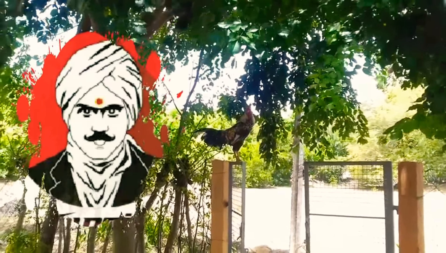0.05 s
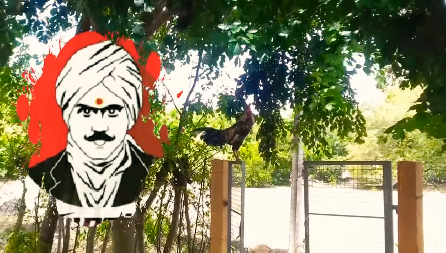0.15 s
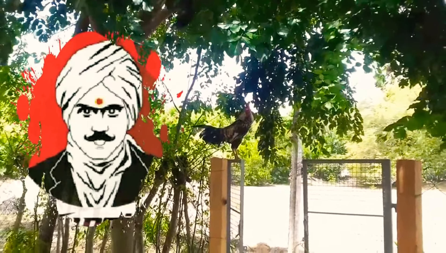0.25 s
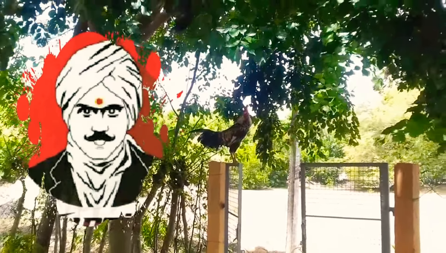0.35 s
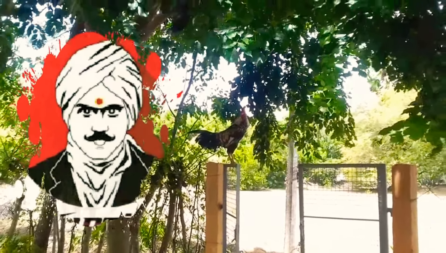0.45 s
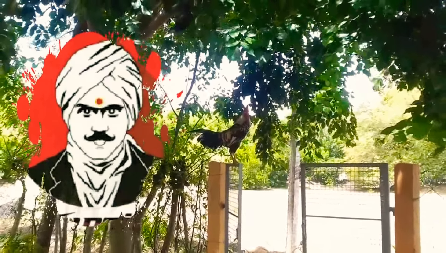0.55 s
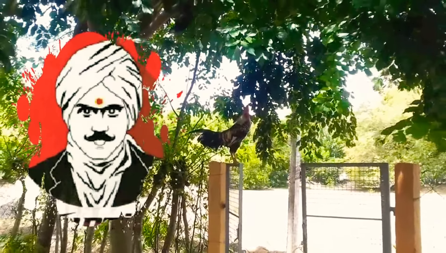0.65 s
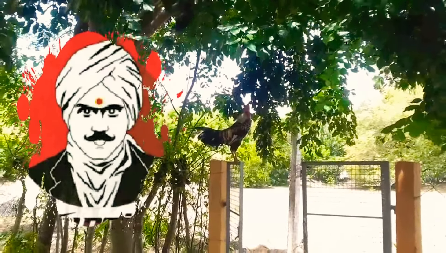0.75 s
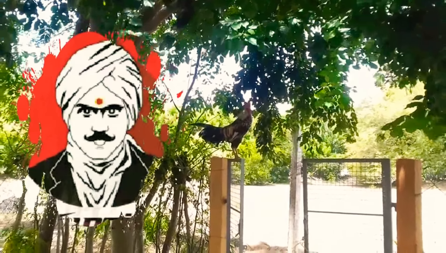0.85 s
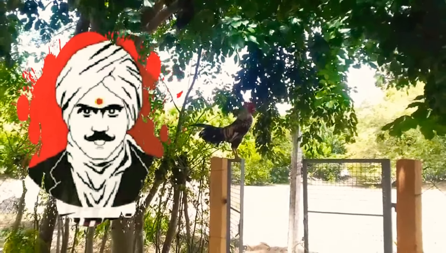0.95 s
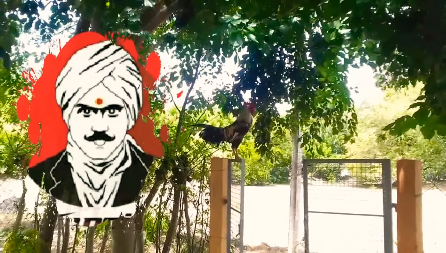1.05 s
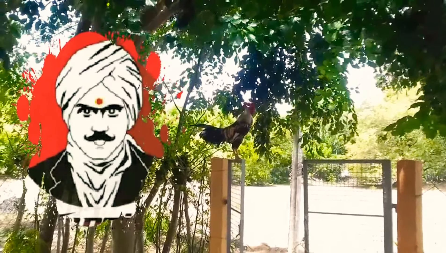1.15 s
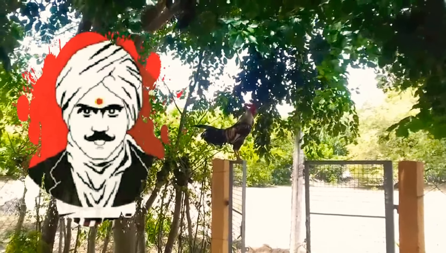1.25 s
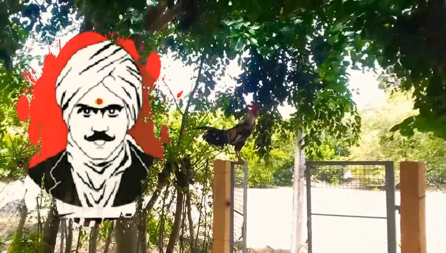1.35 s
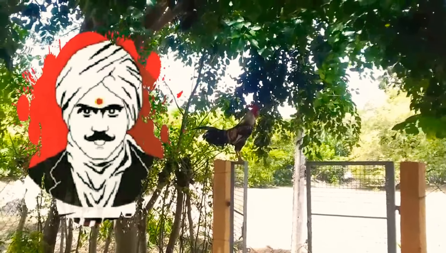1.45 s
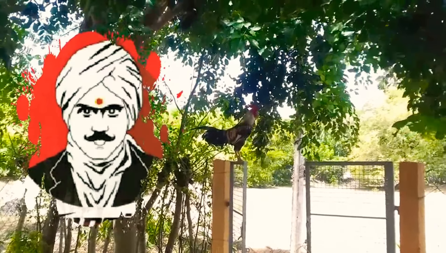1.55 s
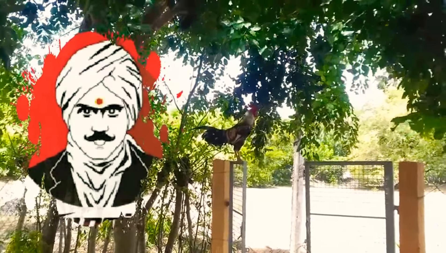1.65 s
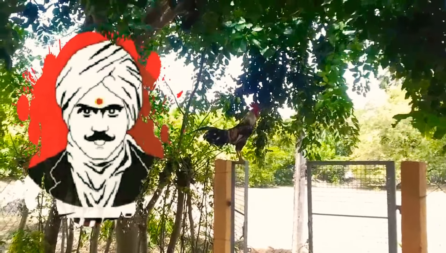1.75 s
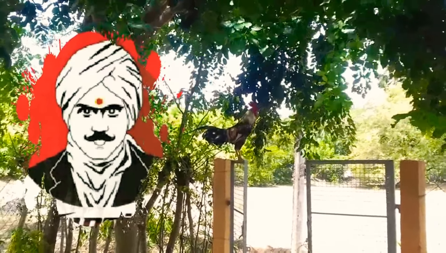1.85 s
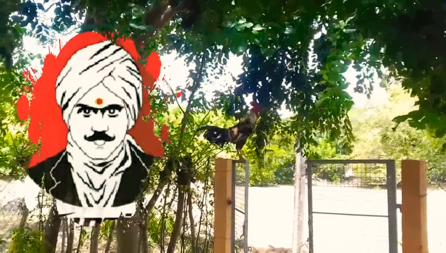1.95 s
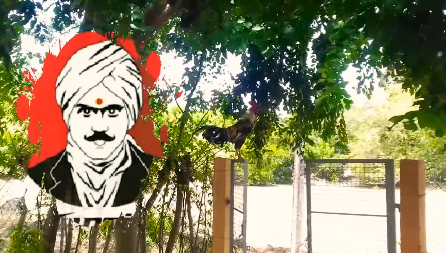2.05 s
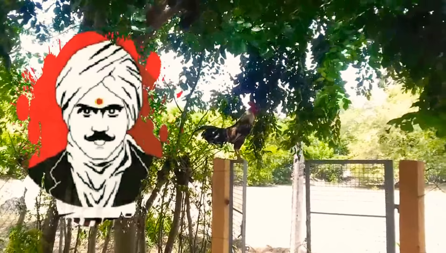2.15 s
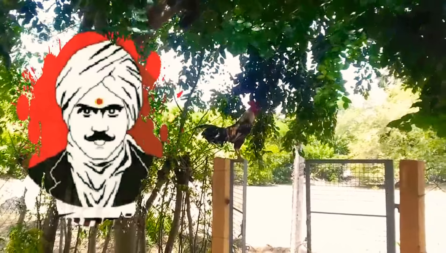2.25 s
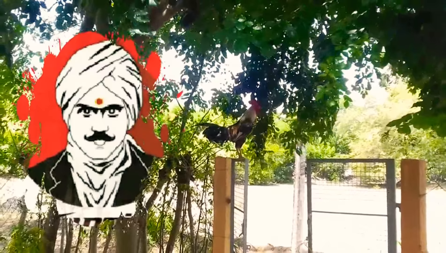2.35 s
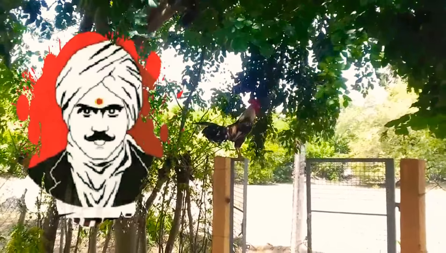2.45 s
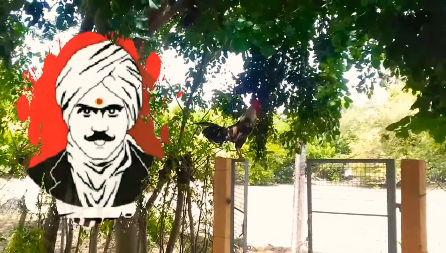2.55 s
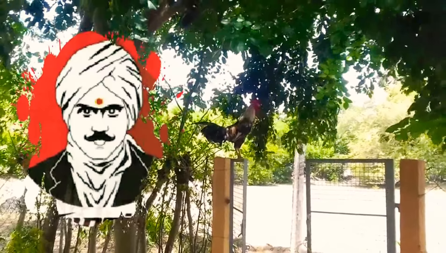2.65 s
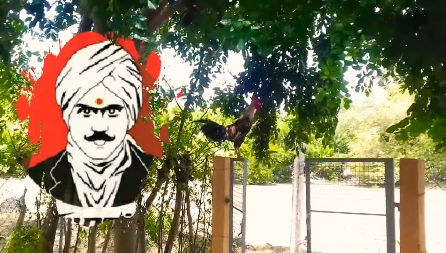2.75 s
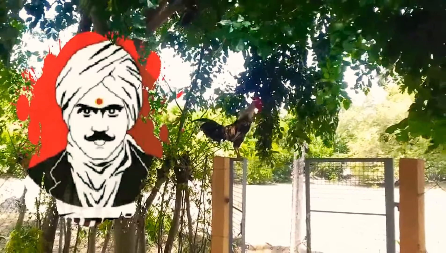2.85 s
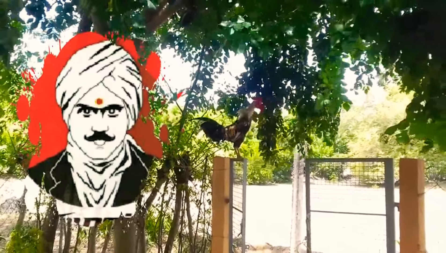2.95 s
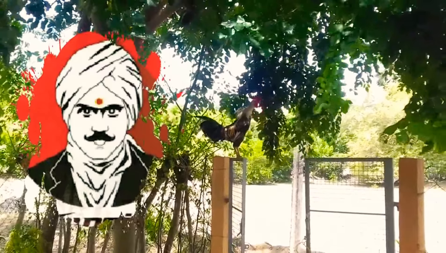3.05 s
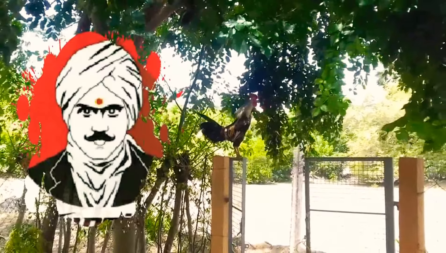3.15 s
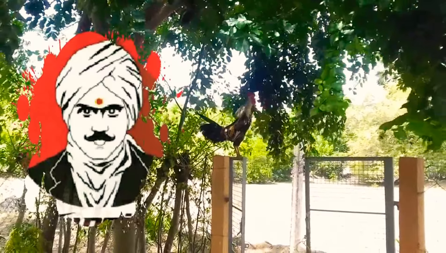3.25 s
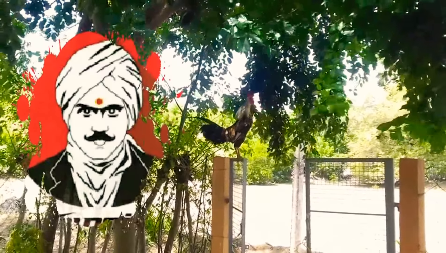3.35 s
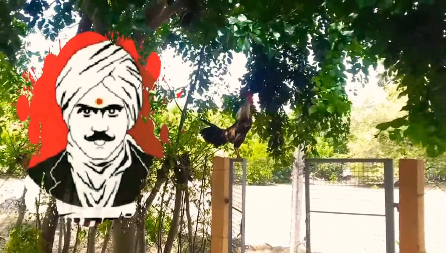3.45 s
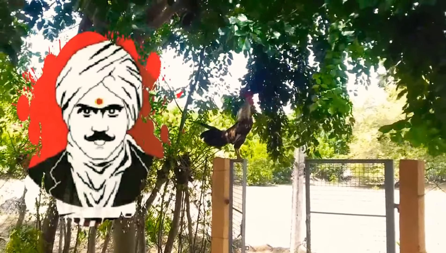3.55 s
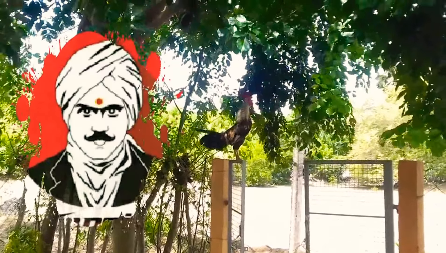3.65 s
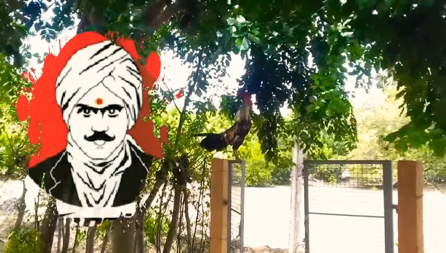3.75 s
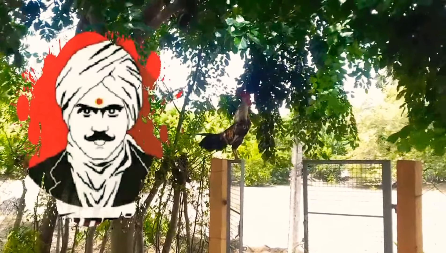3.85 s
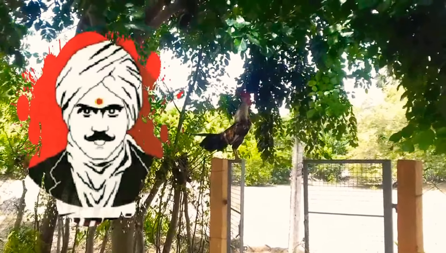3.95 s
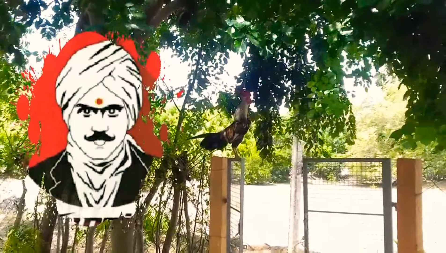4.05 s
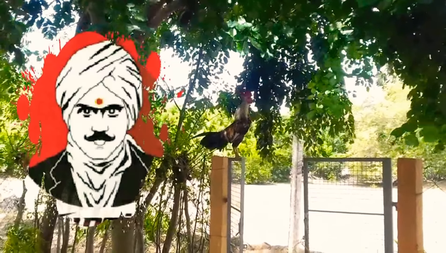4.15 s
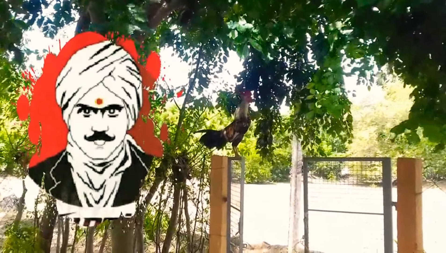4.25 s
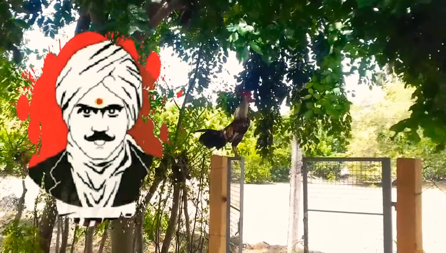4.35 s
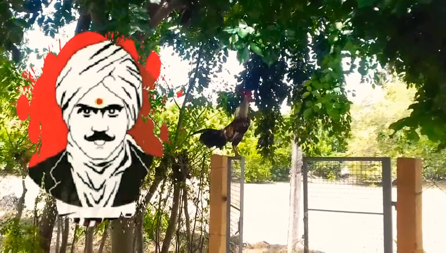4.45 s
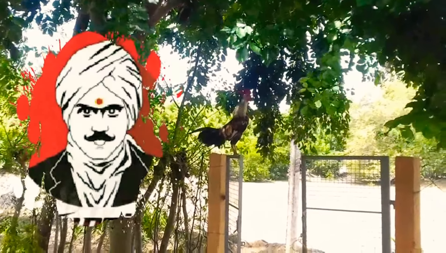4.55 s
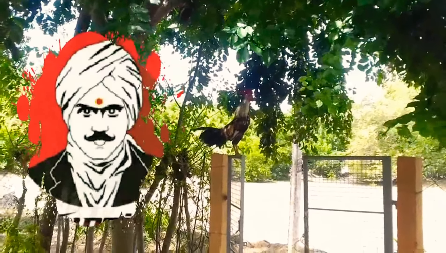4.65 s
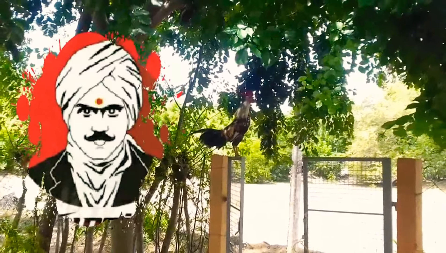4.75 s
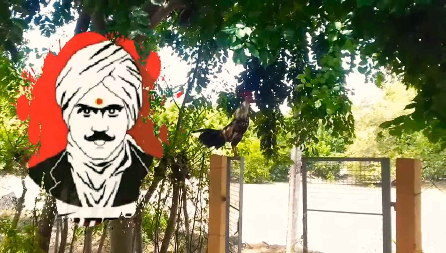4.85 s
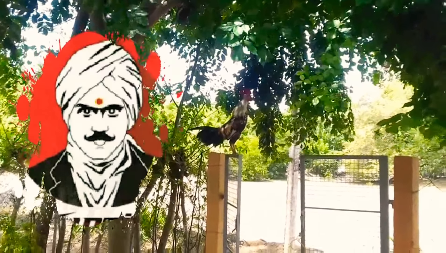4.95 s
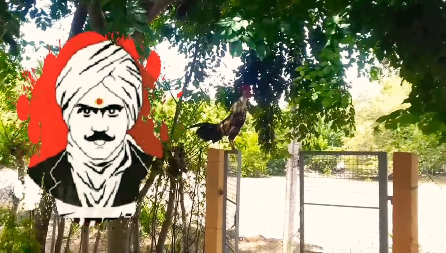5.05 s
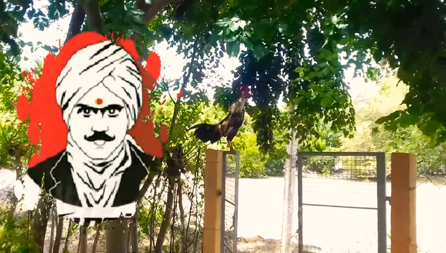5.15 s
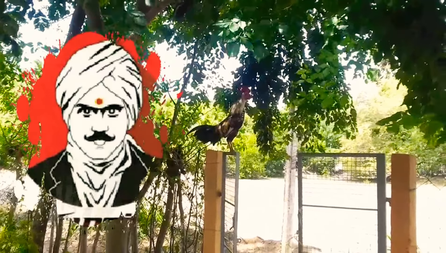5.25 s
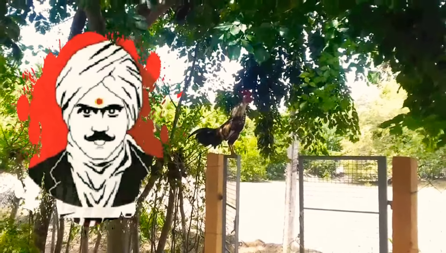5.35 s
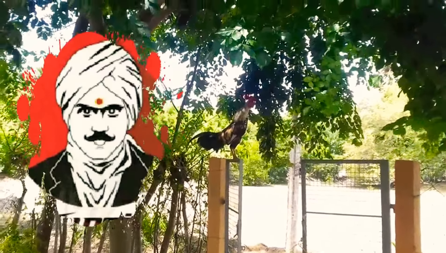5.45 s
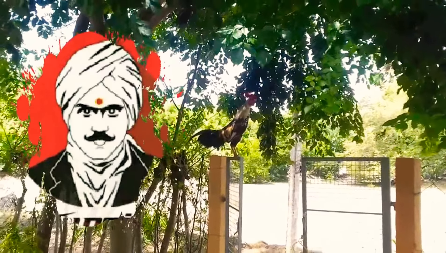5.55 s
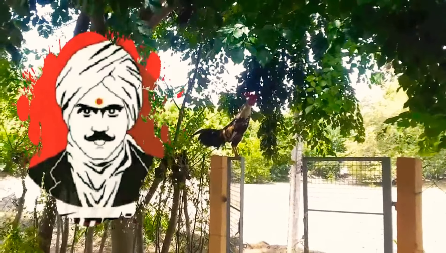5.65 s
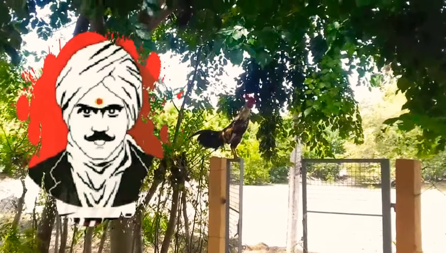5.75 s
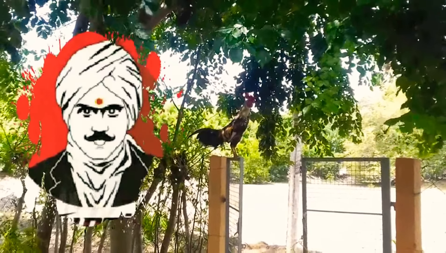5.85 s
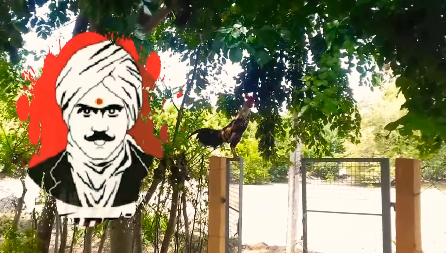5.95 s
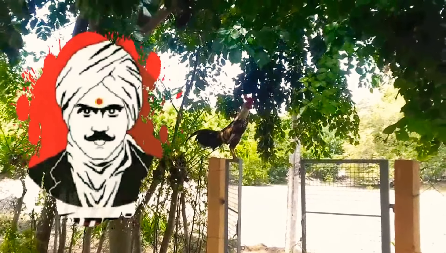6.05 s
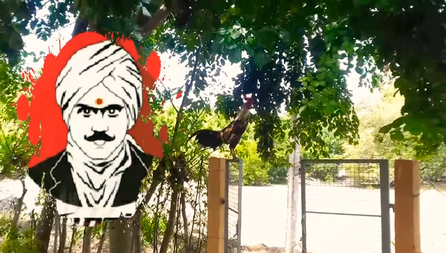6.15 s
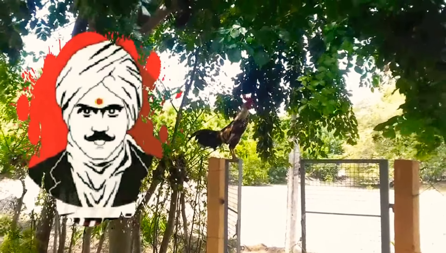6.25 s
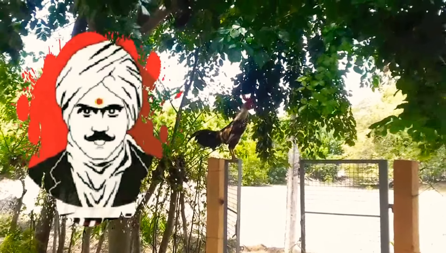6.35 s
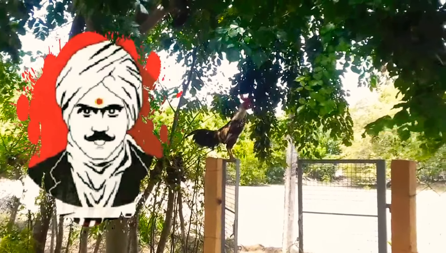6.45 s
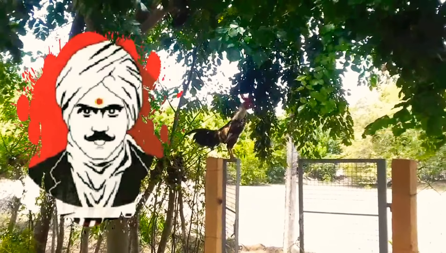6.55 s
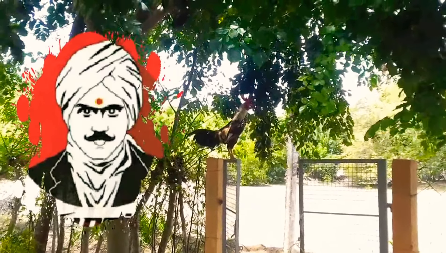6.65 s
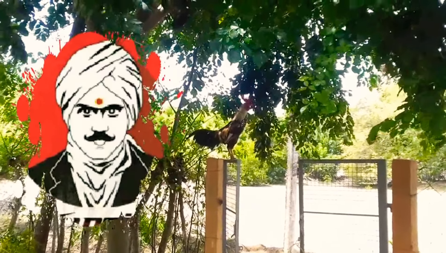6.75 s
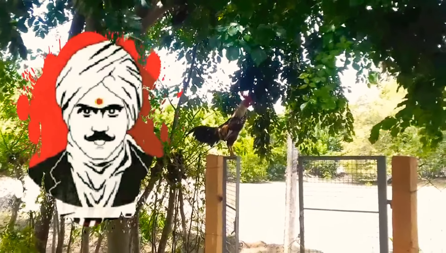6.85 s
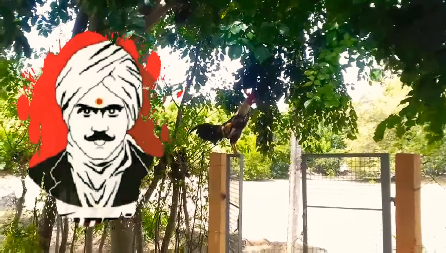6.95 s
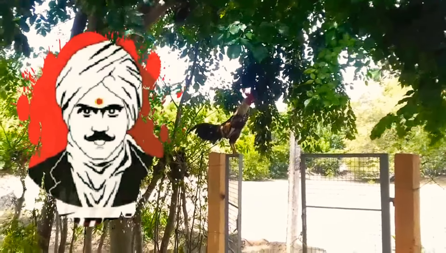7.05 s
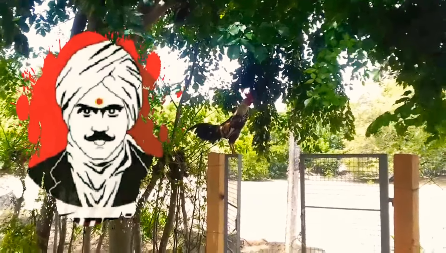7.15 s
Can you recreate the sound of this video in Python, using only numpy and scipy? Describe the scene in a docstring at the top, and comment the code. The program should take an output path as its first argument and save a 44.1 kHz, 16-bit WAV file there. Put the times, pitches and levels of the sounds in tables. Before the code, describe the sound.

A rooster crows once outdoors: a short hoarse syllable, a stepped climb, then a long loud sinking note that stops abruptly over faint leaf hiss.

```python
"""Under trees, a rooster on a gate post crows once: a short hoarse syllable, a climb in steps, then a
long clear note that sinks and breaks into a rasp. The voice is a stack of partials, each smeared into
a noise band where hoarse; sparse echoes from trunks and leaves scatter it. Shaped noise makes the
leaf hiss, the far traffic drone and the wind on the ports; wavering tones are far engines, and
decaying sines are ticking twigs."""
import sys
import numpy as np
from scipy import signal
from scipy.fft import rfft, irfft, next_fast_len
from scipy.io import wavfile
from scipy.ndimage import uniform_filter1d

SR = 44100
rng = np.random.default_rng(int(sys.argv[2]) if len(sys.argv) > 2 else 0)


def master(y):
    """Save y as 16-bit WAV."""
    cut = np.clip(np.atleast_2d(y).T, -1, 1)
    pcm = np.round(cut * 32767)  # scale
    wavfile.write(sys.argv[1], SR, pcm.astype(np.int16))


N = 317079
EDGE_HZ = 15725  # top of the band, for the voice and the whole scene

# road and leaves over time, before patchiness: t/s, road level/dB, tyre drone centre f/Hz, leaves level/dB
YARD = [(0, -63.5, 910, -57.5), (.8, -62, 890, -54.5), (1.5, -62, 900, -56), (2.4, -60.5, 990, -57),
        (2.8, -63, 1040, -62), (3.15, -60, 1095, -60), (5.85, -59, 970, -61.5), (6.8, -56.5, 1000, -60),
        (7.19, -54.5, 960, -56)]
# the held note stays, slips down, then sinks: t/s, pitch f/Hz
HELD = [(3.616, 890), (3.8, 889), (3.9, 894), (4.08, 891), (4.15, 869), (4.27, 854), (4.34, 858),
        (4.69, 844), (5.12, 825), (5.35, 804), (5.44, 793), (5.47, 772)]


def amp(db):
    """Decibels to amplitude."""
    return 10 ** (np.asarray(db) / 20)


def evened(x):
    """Scale to an rms of 1."""
    return x / np.sqrt(np.mean(abs(x) ** 2) + 1e-20)


def read(points, hz):
    """Read a (frequency, value) curve along a log frequency axis."""
    f, value = np.transpose(points)
    return np.interp(np.log(hz + 1), np.log(f + 1), value)


def drift(length, width_hz):
    """Complex low-passed noise of power 1 that changes about width_hz times a second."""
    steps = next_fast_len(length // 16 + 2)  # one step every 16 samples
    hz = np.fft.fftfreq(steps, 16 / SR)
    rolloff = 1 + (hz / width_hz) ** 6
    z = (rng.standard_normal(steps) + 1j * rng.standard_normal(steps)) / np.sqrt(rolloff)
    z = np.fft.ifft(z) * steps / np.sqrt(2 * np.sum(1 / rolloff))
    return np.interp(np.arange(length) / 16, np.arange(steps), z)


def hiss(magnitude, patchy_db):
    """Stereo noise from a bins x frames magnitude, with drifting patches in time and frequency."""
    # left-right likeness of the noise: f/Hz, likeness [0-1]
    likeness = [(60, 0.68), (150, 1), (380, 0.75), (950, 0.96), (2380, 0.79), (5980, 0.61), (15000, 0.8)]
    bins, frames = magnitude.shape
    a, b, c, d, patches = rng.standard_normal((frames, bins, 5)).T
    patches = uniform_filter1d(patches, size=14, axis=0)
    patches = evened(uniform_filter1d(patches, size=10, axis=1))
    same = np.clip(read(likeness, np.fft.rfftfreq(1024, 1 / SR)), 0, 1)[:, None]
    left = a + 1j * b
    right = same * left + np.sqrt(1 - same ** 2) * (c + 1j * d)
    z = 2 * np.array([left, right]) * magnitude * amp(patchy_db * patches)
    return signal.istft(z, nperseg=1024, noverlap=768)[1][:, :N]


def road(hz, t):
    """Traffic spectrum: a steady shape plus a tyre drone, a broad hump that wanders in frequency."""
    # colour of the road noise: f/Hz, relative level/dB
    road_colour = [(59, -82), (100, -39), (113, -14), (227, -9), (433, -8.5), (721, -0.5), (923, -7.5),
                   (1130, -1), (1300, -5), (1820, -4.5), (4000, -12), (5200, -14.5), (8800, -120)]
    s, road_db, drone_hz, _ = np.transpose(YARD)
    hump = np.exp(-((hz - np.interp(t, s, drone_hz)) / 130) ** 2)
    shape = amp(read(road_colour, hz) + 5.9 * hump)
    return shape / np.linalg.norm(shape, axis=0) * amp(np.interp(t, s, road_db))


def leaves(hz, t):
    """Rustle spectrum: one fixed colour whose level rises and falls."""
    # colour of the rustle: f/Hz, relative level/dB
    leaf_colour = [(880, -65), (1500, -5), (1720, -17.5), (2310, -10), (2600, -16.5), (4190, -6),
                   (5460, -7), (6260, -5), (8400, 1.5), (11400, -17.5), (15600, -22.5)]
    s, _, _, leaves_db = np.transpose(YARD)
    shape = amp(read(leaf_colour, hz))
    return shape / np.linalg.norm(shape) * amp(np.interp(t, s, leaves_db))


def wind(hz, t):
    """Wind spectrum: low noise on the ports, a faint floor plus bell-shaped gusts."""
    # colour of the wind: f/Hz, relative level/dB
    wind_colour = [(12, -52), (20, -3), (27, -27), (97, -8), (151, -9), (188, -10.5), (250, -16),
                   (320, -51), (550, -120)]
    # gusts: t/s, peak level/dB, half length/s
    gusts = [(.4, -90, .2), (1.2, -85, .15), (1.602, -74, 0.12), (2.05, -86, .2), (3.21, -87, .1),
             (3.627, -64, 0.18), (4.093, -79, 0.31), (4.646, -80, 0.25), (4.994, -76.5, 0.36),
             (5.52, -65.5, 0.1), (7.1, -90, 0.58)]
    calm_db = -80
    strength = amp(calm_db)
    for at, db, half in gusts:
        strength = strength + amp(db) * np.exp(-((t - at) / half) ** 2)
    shape = amp(read(wind_colour, hz))
    return shape / np.linalg.norm(shape) * strength


def yard():
    """Road and wind share one stereo noise, their powers added; the rustle leans to the right."""
    hz = np.fft.rfftfreq(1024, 1 / SR)[:, None]
    t = np.arange(N // 256 + 5) * 256 / SR
    rustle = hiss(leaves(hz, t), patchy_db=2.03) * amp([[-.6], [.6]])
    return hiss(np.hypot(road(hz, t), wind(hz, t)), patchy_db=-1.0) + rustle


def engines():
    """Far engines: faint tones, wavering in level and phase, that fade in and out."""
    # engine tones: f/Hz, level/dB, from t/s, to t/s
    hums = [(118, -72, 1, 2.1), (195, -80, 1.7, 2.3), (190, -74, 3.5, 4.3), (229, -70, 6.3, 7.5),
            (703, -69, 6.4, 7.4), (1140, -66, 6.8, 7.1)]
    out = np.zeros(N)
    for hz, db, start, end in hums:
        t = np.arange(start, end, 1 / SR)
        tone = (drift(len(t), 3.3) * np.exp(2j * np.pi * hz * t)).real
        tone = tone * signal.windows.tukey(len(t), .4)
        part = out[round(start * SR):][:len(t)]
        part += np.sqrt(2) * amp(db) * tone[:len(part)]
    return out


def ticks():
    """Twigs tick: short dry knocks, each a sine that falls 60 dB in 15 ms."""
    # knocks: t/s, peak level/dB, f/Hz
    knocks = [(2.374, -39.5, 1500), (3.157, -41, 7540)]
    out, t = np.zeros(N), np.arange(1000) / SR
    for s, db, hz in knocks:
        out[round(s * SR):][:1000] += amp(db - 60 * t / 0.015) * np.sin(2 * np.pi * hz * t)
    return out


def controls(end_s):
    """The voice jumps between registers: time, pitch, noise shares, half-pitch level and beak ring."""
    # one row a register: start t/s, pitch from f/Hz, pitch to f/Hz, noise share of the two lowest partials
    # [0-1], noise share of the upper ones [0-1, as at partial 7], half-pitch partials against the level the
    # voice spectrum gives at their own frequency/dB, extra beak ring level/dB
    registers = [(3.18, 690, 760, .3, .6, -20, 6), (3.206, 838, 849, .05, .3, -16, 12),
                 (3.295, 847, 842, .3, .3, -14, 14), (3.398, 680, 740, .5, .75, -25, 0),
                 (3.415, 830, 900, .12, .6, -10, 0), (3.451, 1047, 1032, .03, .28, -16, 6),
                 (3.552, 1010, 996, .008, .25, -7, 6), (3.616, 888, 775, 0, .004, -32, 0),
                 (5.47, 775, 750, .8, 1, -20, 18)]
    # upper noise lingers after a jump and grows with fast slips
    settle_s, slip_hz_per_s = .035, 1400
    start, hz_from, hz_to, low, high, half_db, beak_db = np.transpose(registers)
    t = np.arange(start[0], end_s, 1 / SR)
    row = np.searchsorted(start, t, "right") - 1
    along = (t - start[row]) / np.diff(np.append(start, end_s))[row]
    hz = hz_from[row] + (hz_to - hz_from)[row] * along
    held = (t >= HELD[0][0]) & (t < HELD[-1][0])
    held_hz = np.interp(t, *np.transpose(HELD))
    hz = uniform_filter1d(np.where(held, held_hz, hz), size=180)
    keep = np.exp(-1 / (settle_s * SR))
    lingering = signal.lfilter([1 - keep], [1, -keep], high[row])
    slip = held * uniform_filter1d(np.gradient(held_hz) * SR, size=2000) / slip_hz_per_s
    high = np.maximum(high[row], lingering) + slip ** 2
    # soften the jumps
    low, *rest = uniform_filter1d([low[row], high, half_db[row], beak_db[row]], size=500, axis=1)
    return t, hz, np.clip(low, 0, 1), *rest


def partial_gains(t, hz, beak_db):
    """Windpipe, beak and effort set the level of each partial and of those halfway between."""
    # windpipe and beak: f/Hz, level/dB
    throat = [(2100, 2), (2420, -19), (2660, -32), (3000, -14.5), (3250, 0.5), (3550, 1), (4000, -20),
              (4400, -8.5), (4900, -18.5), (5300, -19), (5600, -12), (5810, 2), (5960, -16), (6300, -18),
              (6700, -16.5), (7200, -3), (7700, -6.5), (8900, -8.5), (9800, -28.5), (11800, -30),
              (15500, -37)]
    # first syllable, climb, held note, rasp: t/s, effort as 2nd partial level/dB,
    # 1st partial level/dB, middle partials level/dB, treble level/dB
    effort = [
        [(3.18, -39, -43, -63, -63), (3.196, -24.5, -30, -35, -42), (3.21, -21.5, -26, -41, -40),
         (3.262, -16.5, -24.5, -42, -36.5), (3.308, -22, -30, -34, -35), (3.345, -51, -38, -44, -41)],
        [(3.398, -28.5, -46, -47, -38.5), (3.426, -16.5, -15.5, -28, -27.5), (3.476, -19.5, -27, -30.5, -18.5),
         (3.53, -9, -35, -31, -21.5), (3.542, -17, -23.5, -23.5, -28), (3.588, -16.5, -26.5, -24.5, -25.5),
         (3.62, -19.5, -16.5, -32, -27)],
        [(3.64, -16, -18, -28.5, -21.5), (3.68, -14.5, -20, -27.5, -24.5), (4.022, -13.5, -17, -35, -22.5),
         (4.102, -16.5, -25, -33.5, -27.5), (4.238, -15, -22.5, -34, -23), (4.29, -16, -24, -41, -28),
         (4.334, -15.5, -22, -34.5, -26), (4.38, -14.5, -24.5, -42.5, -27), (4.41, -14.5, -23.5, -35, -22),
         (4.576, -18.5, -28, -34.5, -23), (4.628, -13.5, -25, -35, -24), (4.662, -20.5, -20, -42.5, -30.5),
         (4.804, -28, -25, -46.5, -32), (4.844, -18.5, -27, -41, -27), (4.904, -19, -23.5, -44.5, -29.5),
         (4.96, -21.5, -29, -31.5, -32), (5.126, -26.5, -29, -41, -37), (5.166, -19.5, -28, -51, -25.5),
         (5.222, -17.5, -31, -35.5, -31), (5.288, -33, -26.5, -41.5, -34.5), (5.428, -19, -27, -30.5, -32),
         (5.45, -18.5, -23, -34, -37.5)],
        [(5.48, -21, -25, -39.5, -34.5), (5.54, -40, -45, -52, -49)],
    ]
    # partials follow the effort, then the middle level, then the treble level: corners f/Hz
    middle_hz = (2800, 3100, 5000, 6800)
    beak_hz, beak_width_hz = 6000, 550
    s, *levels = np.concatenate(effort).T
    second_db, first_db, middle_db, treble_db = (np.interp(t, s, c) for c in levels)
    # the bird draws breath between the first syllable, which dies over 8.4 ms, and the climb
    voiced = np.clip((3.345 - t) / 0.0084, 0, 1) + (t > 3.398)
    k = np.arange(1, 21, 1 / 2)[:, None]  # partial numbers with their half steps
    middle = np.interp(k * hz, middle_hz, (0, 1, 1, 0))
    bright = np.interp(k * hz, middle_hz, (0, 0, 0, 1))
    level_db = (1 - middle - bright) * second_db + middle * middle_db + bright * treble_db
    ring_db = beak_db * np.exp(-((k * hz - beak_hz) / beak_width_hz) ** 2)
    gain = amp(read(throat, k * hz) + level_db + ring_db)
    # partials 1, 1.5 and 2 bypass the throat curve
    gain[:3] = amp([first_db, (first_db + second_db) / 2, second_db])
    return abs(uniform_filter1d(gain * voiced * (k * hz < EDGE_HZ), size=200, axis=1))


def rooster():
    """Partials of the syrinx membranes; hoarseness smears each one into a noise band."""
    # the tremble is strongest where the held note starts, then calms down; scaled per partial below
    flutter_share, flutter_hz, flutter_fade_s = 0.33, 48.6, 0.77
    fading_db, fading_hz = 4.5, 2.5  # the top partials slowly come and go (dB rms, rate)
    t, hz, low, high, half_db, beak_db = controls(end_s=5.54)
    gain = partial_gains(t, hz, beak_db)
    calming = np.exp(-abs(t - HELD[0][0]) / flutter_fade_s)
    flutter = flutter_share * calming * drift(len(t), flutter_hz).real
    turns = np.cumsum(hz * (1 + .0007 * drift(len(t), 30).real)) / SR  # slight pitch jitter
    cycle, half_cycle = np.exp(2j * np.pi * turns), np.exp(1j * np.pi * turns)
    voice, partial = np.zeros(len(t)), np.ones(len(t))
    for n, (g, between) in enumerate(zip(gain[::2], gain[1::2]), 1):
        partial = partial * cycle * np.exp(2j * np.pi * rng.random())
        rough, sway = low, 1
        if n >= 3:
            # moving head and leaves make the upper partials swell and fade on their own
            loose = min(0.068 * n, .92)
            rough = np.clip(high * (n / 7) ** 3.1, low, 1)
            sway = np.sqrt(1 - loose) + np.sqrt(loose) * drift(len(t), 16.5)
        fading = np.interp(n, (2, 4, 9, 13), (0, .3, .3, 1))
        g = g * amp(fading_db * fading * np.sqrt(2) * drift(len(t), fading_hz).real)
        tone = np.sqrt(1 - rough) * sway + np.sqrt(rough) * drift(len(t), min(130 * n, 400))
        # every other membrane cycle is slightly weaker: faint lines between the partials
        half = amp(half_db) * between * (0.45 + 0.4 * drift(len(t), 22)) * half_cycle
        voice += ((g * tone + half) * partial).real * (1 + min(0.38 * n, 1.5) * flutter)
    out = np.zeros(N)
    out[round(t[0] * SR):][:len(t)] = np.sqrt(2) * voice * signal.windows.tukey(len(t), .004)
    # a small throat radiates no bass
    return signal.sosfilt(signal.butter(4, 600, "high", fs=SR, output="sos"), out)


def trees(x):
    """Sparse echoes of random sign, each band dying at its own speed; ports differ most in the treble."""
    # decay among the trees: f/Hz, t60/s
    decay = [(500, 0.1), (800, 0.45), (1600, 0.62), (2400, 0.52), (3500, 0.45), (6000, 0.56), (10000, 0.14)]
    taps = np.zeros((2, SR))
    # one tap at a random place in every 30 samples
    at = np.arange(400, SR - 30, 30) + rng.integers(0, 30, (2, (SR - 401) // 30))
    np.put_along_axis(taps, at, rng.choice([-1., 1.], at.shape), 1)
    hz, t, z = signal.stft(taps, SR, nperseg=256)
    apart = np.clip(hz / 11000, 0, 1)[:, None] ** 2.4
    z = np.array([z[0] + apart * z[1], z[0] - apart * z[1]])
    tail = signal.istft(z * amp(-60 * t / read(decay, hz)[:, None]), SR, nperseg=256)[1]
    return signal.fftconvolve(x[None], tail / np.linalg.norm(tail[0]), axes=1)[:, :N]


def scene():
    """Direct and scattered call, its treble leaning right, over yard, engines and ticks."""
    # the treble of the call favours the right port: f/Hz, left-right level/dB
    side_db = [(3500, 0), (5500, -1), (7500, -3), (9500, -2), (12000, 0)]
    direct_db, trees_db = -1.94, -14.5
    bird, size = rooster(), next_fast_len(N)
    heard = amp(direct_db) * bird + amp(trees_db) * trees(bird)
    lean = read(side_db, np.fft.rfftfreq(size, 1 / SR)) / 2
    heard = irfft(rfft(heard, size) * amp([lean, -lean]), size)[:, :N]
    return heard + yard() + engines() + ticks()


def record(dry):
    """A slightly lopsided capsule turns loudness changes into rumble; offset and band limit follow."""
    rumble = signal.lfilter(*signal.butter(2, [22, 60], "band", fs=SR), dry ** 2)
    bent = dry + 0.11 * rumble - .0009  # constant offset
    band_limit = signal.firwin(511, EDGE_HZ, window=("kaiser", 9), fs=SR)
    return signal.oaconvolve(bent, band_limit[None], "same")


dry = scene()
out = record(dry)
master(out)
```